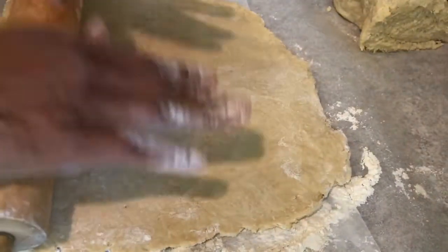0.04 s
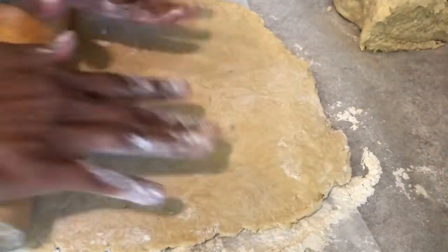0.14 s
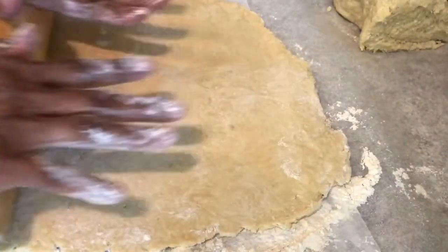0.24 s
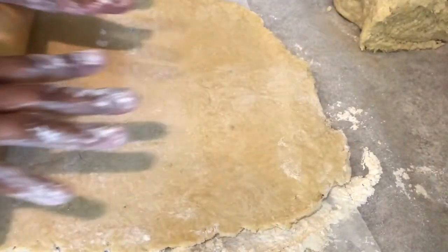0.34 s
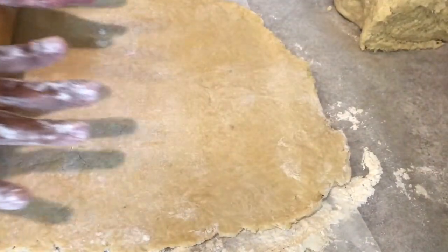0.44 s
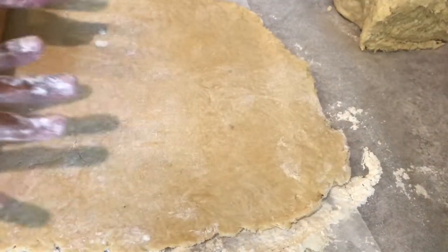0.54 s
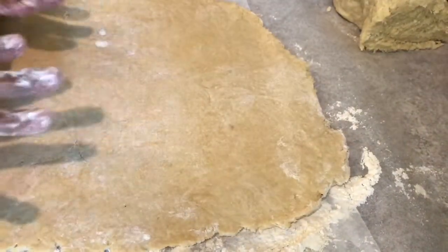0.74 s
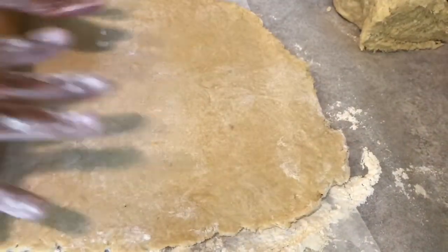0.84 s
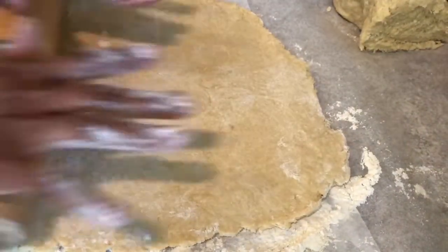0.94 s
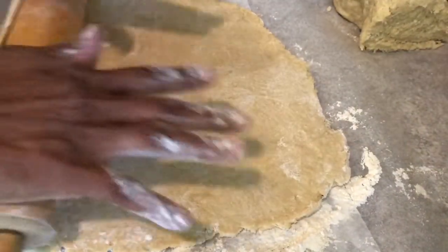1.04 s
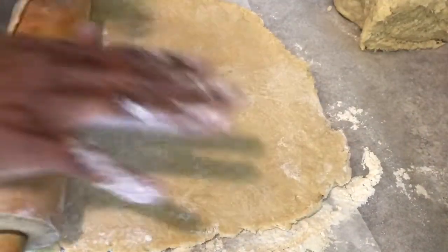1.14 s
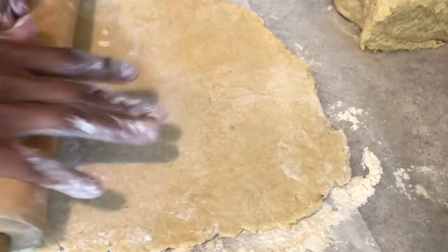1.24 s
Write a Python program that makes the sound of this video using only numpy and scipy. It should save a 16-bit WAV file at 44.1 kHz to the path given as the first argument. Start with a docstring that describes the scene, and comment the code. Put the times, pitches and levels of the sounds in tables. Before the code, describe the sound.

Sticky dough crackling and snapping under a wooden rolling pin, with one faint knock.

```python
"""A wooden rolling pin works soft, sticky dough on a floured stone counter, close to the microphone.
Over low rumble, hum and hiss, the pin starts to roll with a fine crackle and a scrape of flour.
The first faint snaps come as dough peels off pin and counter; at 0.1 s the pin knocks and rings briefly.
The snaps grow crisp, are loudest near 0.9 s and then fade. The kitchen answers each snap,
and the knock, with a short tail."""
import sys
import numpy as np
from scipy import signal
from scipy.fft import rfft, irfft, next_fast_len
from scipy.io import wavfile
from scipy.ndimage import uniform_filter1d, map_coordinates

SR = 44100
rng = np.random.default_rng(int(sys.argv[2]) if len(sys.argv) > 2 else 0)


def bounce(signal):
    """Save signal as a 16-bit WAV file at the path given by the first command-line argument."""
    frames = np.transpose(np.atleast_2d(signal))
    limited = np.clip(frames, -1, 1)
    pcm = np.round(limited * 32767).astype(np.int16)
    wavfile.write(sys.argv[1], SR, pcm)


N = 57330

# Treble spectrum of the snaps and the pin's click: frequency_hz, density_db
TREBLE_SPECTRUM = [(6300, -12), (8000, 0.5), (10000, -1), (14000, -4), (16500, -0.5)]


def amp(db):
    """Amplitude ratio of a level in decibels."""
    return 10 ** (np.asarray(db) / 20)


def unit(x):
    """Normalisation to rms 1."""
    return x / np.sqrt(np.mean(x ** 2) + 1e-20)


def even(x, size):
    """Division by the running rms over size samples steadies the level."""
    return x / np.sqrt(np.abs(uniform_filter1d(x ** 2, size=size)) + 0.0011)


def along(points, hz):
    """Interpolation on a logarithmic frequency axis."""
    frequencies, values = np.transpose(points)
    return np.interp(np.log(hz + 1), np.log(frequencies + 1), values)


def curve(rows):
    """Linear interpolation in time, one value per sample."""
    return np.interp(np.arange(N) / SR, *np.transpose(rows))


def wobble(rate):
    """Random modulation: a spline through rate knots a second."""
    knots = rng.standard_normal(int(N * rate / SR) + 4)
    return map_coordinates(knots, [np.arange(N) * rate / SR])


def filtered(x, response):
    """Filtering as multiplication of the spectrum by a response."""
    size = next_fast_len(N + 8192)
    return irfft(rfft(x, size) * response(np.fft.rfftfreq(size, 1 / SR)), size)[..., :N]


def noise(spectrum):
    """Coloured noise of rms 1, rolling off beyond the spectrum's ends."""
    closed = [(spectrum[0][0] / 2, -90)] + list(spectrum) + [(spectrum[-1][0] * 2, -90)]
    return unit(filtered(rng.standard_normal(N), lambda hz: amp(along(closed, hz))))


def background(hiss_db=-67.5):
    """Superposition of structure-borne rumble in the counter, wavering mains hum and steady air noise."""
    # Mains harmonics: frequency_hz, relative_db
    harmonics = [(60, -74.5), (120, -74.5)]
    # Rumble envelope: time_s, level_db
    envelope = [(0, -67.5), (.09, -63), (.16, -59), (.21, -65.5), (.27, -60), (.33, -65.5), (.39, -63.5),
                (.45, -68.5), (.515, -61.5), (.6, -65), (.75, -67), (.82, -62.5), (.9, -55.5), (.96, -56.5),
                (1.0, -64.5), (1.1, -68), (1.2, -69.5), (1.25, -62), (1.3, -68)]
    # Spectra of rumble and air noise: frequency_hz, density_db
    rumble_spectrum = [(25, -20), (60, -4.5), (125, 3), (200, 0), (300, -8), (500, -15), (1000, -22),
                       (2000, -30)]
    hiss_spectrum = [(150, 3), (600, -3), (1400, -12), (3000, -15), (16000, -20.5)]
    t = np.arange(N) / SR
    hum = sum(amp(db + 2 + 1.3 * wobble(6.9)) * np.sin(2 * np.pi * hz * t) for hz, db in harmonics)
    rumble = amp(curve(envelope) + 2.3 * wobble(24.19)) * even(noise(rumble_spectrum), size=1800)
    return rumble + hum + amp(hiss_db) * noise(hiss_spectrum)


def rolling(grains_per_s=700, grain_ms=0.96, spread_db=2, scrape_over_grains_db=3):
    """Shot noise and friction: tiny random crackles over the smooth scrape of flour under the pin."""
    # Rolling envelope: time_s, level_db
    envelope = [(0, -77), (.068, -70), (.078, -59), (.2, -59.5), (.232, -54.5), (.28, -47.5), (.33, -48.5),
                (.42, -56.5), (.47, -59), (.5, -52.5), (.55, -60.5), (.65, -52), (.74, -69.5), (.8, -49.5),
                (.87, -36.5), (.92, -32.5), (.96, -43), (1.04, -57.5), (1.14, -62.5), (1.22, -60),
                (1.3, -63.5)]
    # Spectrum of crackle and scrape: frequency_hz, density_db
    spectrum = [(400, -20), (900, -12.5), (1900, -8), (2500, -5), (2950, 1.5), (3500, -2.5), (5000, -1.5),
                (7000, -7.5), (10000, -11.5), (16000, -14)]
    hits = rng.random(N) < grains_per_s / SR
    strengths = amp(spread_db * np.minimum(rng.exponential(size=N), 2.5))
    decay = np.exp(-np.arange(SR // 100) / SR * 1000 / grain_ms)
    grains = signal.fftconvolve(hits * strengths, decay)[:N]
    scrape = amp(scrape_over_grains_db) * amp(1.2 * wobble(59.6))
    return amp(curve(envelope)) * unit(unit(grains) + scrape) * noise(spectrum)


def snaps(rise_ms=0.18, roughness_db=3.5):
    """Adhesion fails: dough lets go in noise bursts that rise, tear and decay, adding in power."""
    # Dough releases: start_s, level_db, tear_ms, body_db, low_crack_db, treble_db
    # (the last three relative to the high crack)
    releases = [(0.0751, -46.5, 0.93, 9, 17, 3), (0.083, -51.5, 3, 13, 7, -5), (0.091, -53, 3.5, 2, 4, 7),
                (0.094, -53, 3, -13, 5, 0), (0.1005, -49.5, 4.7, 3, 9, 2), (0.157, -52.5, 4, -13, -12, 6),
                (0.1798, -44, 0.65, -28, -26, 3), (0.2358, -41.5, 3.4, -11, -4, 4),
                (0.2401, -28.5, 1.6, -23, -1, 3), (0.247, -31, 2.5, -18.5, -5, 0),
                (0.2503, -30, 1.5, -22, -9, -5), (0.2543, -35.5, 3.2, -9.5, 3, -2),
                (0.257, -35, 2.1, -22, -12, 2), (0.2697, -19.5, 0.96, -25, -3, -7),
                (0.2708, -16.5, 1.86, -30, -9.5, 1.5), (0.2732, -25.5, 2.65, -12, -2, -1),
                (0.2804, -36, 2.5, -9, 6, -9), (0.2884, -33, 7.3, -14.5, -4, 2),
                (0.3028, -36, 3.5, -22, -14, -4), (0.313, -40.5, 1.6, -15, 15, -11),
                (0.346, -29.5, 2.7, -12.5, -1, -3), (0.3763, -22.5, 1.5, -11, -5.5, 3.5),
                (0.3841, -36, 1.1, -4, -17, -4), (0.398, -41.5, 1.8, -3.5, 6, -8),
                (0.405, -45.5, 4.2, -9, 12, -13), (0.425, -39.5, 2.1, -17, -9, -1),
                (0.44, -28.5, 2.04, -22.5, -5.5, -6), (0.445, -38.5, 2, -20, -2, -1),
                (0.476, -27.5, 1, -16, -5, -8), (0.4772, -16.5, 2.7, -21.5, -9, 2.5),
                (0.482, -27.5, 3.1, -14, -2.5, -1), (0.4972, -33.5, 2.9, -18, -1.5, 2),
                (0.5644, -36.5, 2.8, -23, -1, -6), (0.5678, -26.5, 1.4, -17.5, 2, 0),
                (0.5731, -32.5, 1, -15, -11, -6), (0.597, -39, 4.3, -14, -0.5, -8),
                (0.608, -42, 2, -1.5, 6, -16), (0.6271, -30, 2.8, -21, -1.5, 2),
                (0.6321, -29.5, 2.8, -15, -5, -2), (0.641, -29.5, 3.7, -20, -5, -2),
                (0.6772, -23.5, 1.07, -27.5, -11, -1.5), (0.687, -50, 2.3, -19, -18, -7),
                (0.7532, -28, 1.56, -23, -10.5, -6), (0.7626, -46.5, 1.6, -8, -2, -12),
                (0.7844, -39, 2.4, -25, 2, -10), (0.8012, -35.5, 1.2, -22, -6, -2),
                (0.8095, -26, 2.6, -20, -2, 0.5), (0.8214, -28, 1.5, -22, -5, -4),
                (0.839, -40, 3, -15, -16, -11), (0.845, -27.5, 1.4, -23.5, -14, -1),
                (0.864, -32, 3.8, -17, -2, -6), (0.8745, -30, 2, -17, -4, 3),
                (0.8793, -21.5, 1.8, -14, -25, 1), (0.886, -24, 5, -15.5, -4, -2),
                (0.8916, -20.5, 1, -13, -3, 1), (0.8924, -16, 2.6, -15, -0.5, 1.5),
                (0.902, -24, 2.9, -6, 1.5, -1), (0.909, -26, 2, -20, -6, -1),
                (0.912, -18.5, 6.7, -20.5, -7.5, -2.5), (0.9231, -20.5, 3.8, -25, -7.5, -2.5),
                (0.9478, -26.5, 3.7, -15, -9, -1), (0.957, -35, 1.4, -9, 2, 8),
                (0.9756, -32, 1.8, -12, 3, 5.5), (1.0151, -34, 1.2, -18, -17, -7),
                (1.003, -40, 1.6, -20, 0, -2), (1.0689, -50, 3.7, -8, -1, -21),
                (1.11, -57, 1.2, -15, -7.5, 15), (1.1466, -32, 1.8, -23, -1.5, -11.5),
                (1.156, -52.5, 6, 0, -1, -21), (1.176, -51, 1.6, -8, 1, -18),
                (1.194, -52, 3.1, -11, 21, -5.5), (1.1964, -50.5, 2.4, -15.5, 18, -10),
                (1.203, -52, 3.6, -7, 8.5, -3), (1.2135, -51.5, 3.5, -10, 0, 6),
                (1.2322, -51.5, 7, 0.5, 5, -13)]
    # Spectra of the bands below the treble: frequency_hz, density_db
    body = [(300, -8.5), (600, -6.5), (1000, -1), (1900, -3), (3000, -13)]
    low_crack = [(1500, -19.5), (2300, -8), (2950, 0.5), (3700, -1.5), (4500, -6)]
    high_crack = [(3300, -14.5), (4100, -1), (5000, -0.5), (7000, -2.5), (8500, -11.5)]
    # Weakening during a tear: body_db, low_crack_db, high_crack_db, treble_db
    sag_db = [2.9, 3.5, 5.4, 6]
    fall_ms = np.array([2.45, 2.23, 1.5, 1.27])[:, None]  # time constants of the same bands
    ms = np.arange(N) / SR * 1000
    power = np.zeros((4, N))
    for start_s, level_db, tear_ms, body_db, low_crack_db, treble_db in releases:
        age_ms = ms - start_s * 1000
        shape = np.exp(np.minimum(age_ms / rise_ms, 0) - np.clip(age_ms - tear_ms, 0, None) / fall_ms)
        torn = np.clip(age_ms / tear_ms, 0, 1)
        envelope = shape * amp(level_db - np.array(sag_db)[:, None] * torn)
        share = amp([body_db, low_crack_db, 0, treble_db])[:, None]
        power += (envelope * share / np.linalg.norm(share)) ** 2
    bands = np.array([noise(band) for band in (body, low_crack, high_crack, TREBLE_SPECTRUM)])
    tearing = even(amp(roughness_db * wobble(900)) * bands, size=70)
    return amp(-2.5) * (np.sqrt(power) * tearing).sum(axis=0)


def ring(modes, start_s, attack_s):
    """Free vibration: each struck mode is an exponentially damped sinusoid."""
    t = np.clip(np.arange(N) / SR - start_s, 0, None)
    vibration = sum(amp(db - 60 * t / t60) * np.sin(2 * np.pi * hz * t) for hz, db, t60 in modes)
    return vibration * (1 - np.exp(-t / attack_s))


def knock(start_s=0.1063, push_lead_s=0.0067, thud_lag_s=0.00286):
    """Impact excites modes: the dough takes the weight, the pin clicks and rings, the counter thuds."""
    # Bright modes of the pin: frequency_hz, relative_db, t60_s
    pin_modes = [(2290, -12, 0.1), (2890, -5, 0.05), (4480, -6.5, 0.075), (5880, -2, 0.064),
                 (7800, 1.5, .015), (11900, -1, 0.024)]
    # Modes of the counter and wooden body: frequency_hz, relative_db, t60_s
    thud_modes = [(136, -11, 0.23), (198, -3, 0.1), (287, -9, 0.14), (395, -4.5, 0.082), (563, -5, 0.083),
                  (980, 4.5, 0.027), (1250, 0.5, 0.025), (1515, 4.5, 0.032)]
    t = np.arange(N) / SR - start_s
    push = ring([(69.6, -47.5, 0.106)], start_s - push_lead_s, attack_s=0.0019)
    click = (t > 0) * amp(-46.5 - 60 * np.abs(t) / 0.012) * noise(TREBLE_SPECTRUM)
    pin = amp(-42.5) * ring(pin_modes, start_s, attack_s=0.0016)
    thud = amp(-44) * ring(thud_modes, start_s + thud_lag_s, attack_s=0.0011)
    thud_age = t - thud_lag_s
    dull_noise = noise([(150, 11), (600, -9), (2500, -17)])
    puff = (thud_age > 0) * amp(-51 - 60 * np.abs(thud_age) / 0.13) * dull_noise
    return push + click + pin + thud + puff


def kitchen(x, near_db=-9.5, near_t60_s=0.026, tail_db=-16):
    """Reverberation: early scatter off counter and hands, and a tail whose treble dies first."""
    # Reverberation times: frequency_hz, t60_s
    decay_times = [(300, 1), (3000, 0.58), (14000, 0.12)]
    hz, t, spectrum = signal.stft(rng.standard_normal(SR // 2), SR, nperseg=256)
    decay = amp(-60 * t / along(decay_times, hz)[:, None])
    tail = signal.istft(spectrum * decay, SR, nperseg=256)[1]
    near = rng.standard_normal(len(tail)) * amp(-60 * np.arange(len(tail)) / SR / near_t60_s)
    response = amp(tail_db) * tail / np.linalg.norm(tail) + amp(near_db) * near / np.linalg.norm(near)
    return signal.fftconvolve(x, response)[:N]


def scene():
    """Pressures add at the microphone; only snaps and knock reverberate."""
    transients = snaps() + knock()
    return (transients + kitchen(transients) + rolling() + background())[None]


def record(dry):
    """Band limiting: a bass roll-off, a shelf down in the top treble and a cutoff above it."""
    bass_hz, shelf_hz, shelf_db, cutoff_hz = 42, 15650, -30, 16970

    def response(hz):
        shelf = amp(shelf_db * np.clip((hz - shelf_hz) / 250, 0, 1))
        return (hz < cutoff_hz) * shelf / np.sqrt(1 + (bass_hz / (hz + 1)) ** 8)
    return filtered(dry, response)


dry = scene()
out = record(dry)
bounce(out)
```